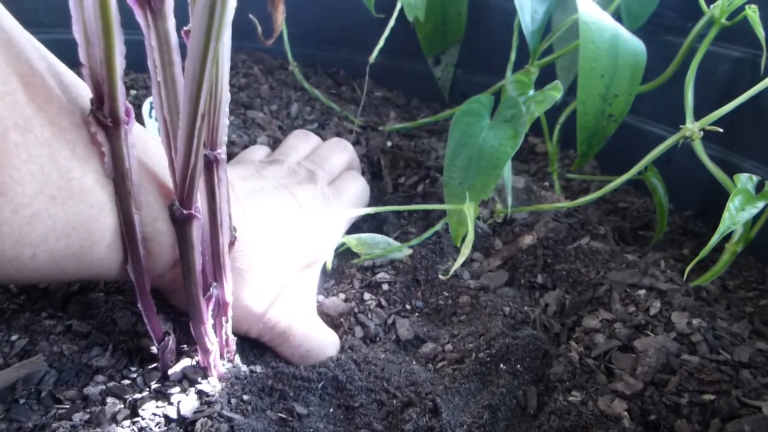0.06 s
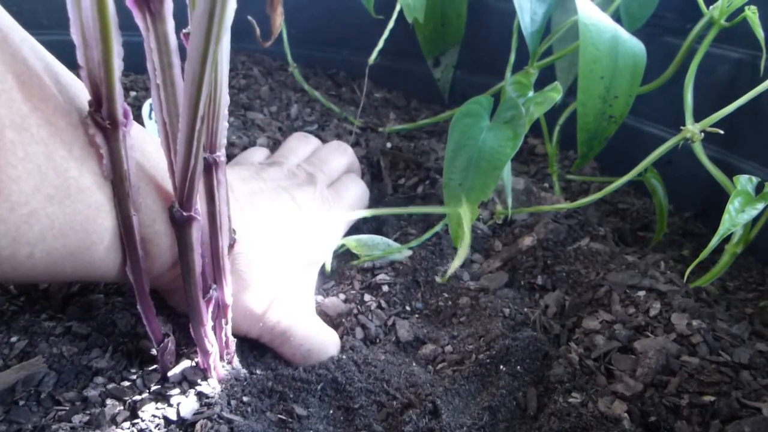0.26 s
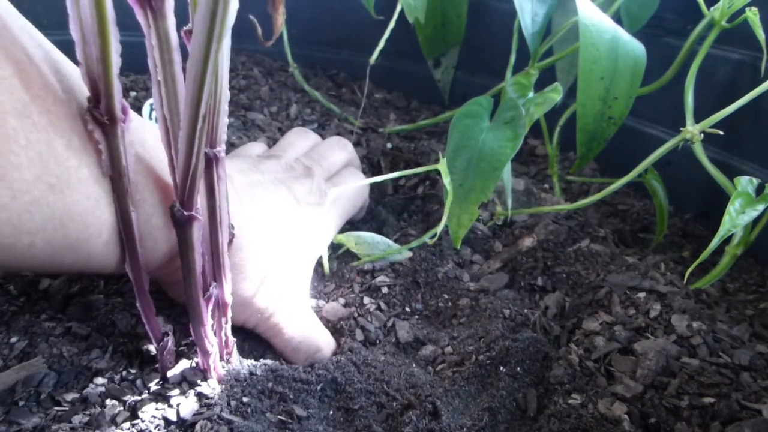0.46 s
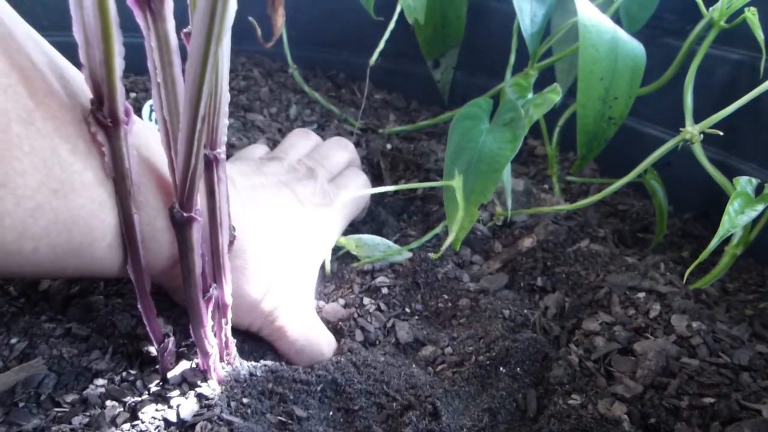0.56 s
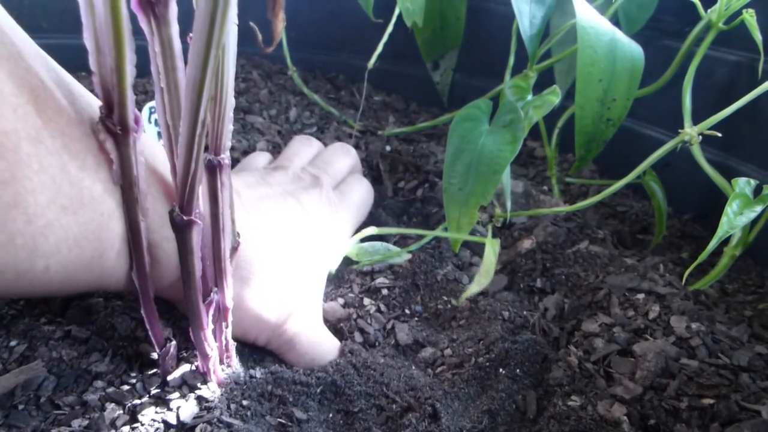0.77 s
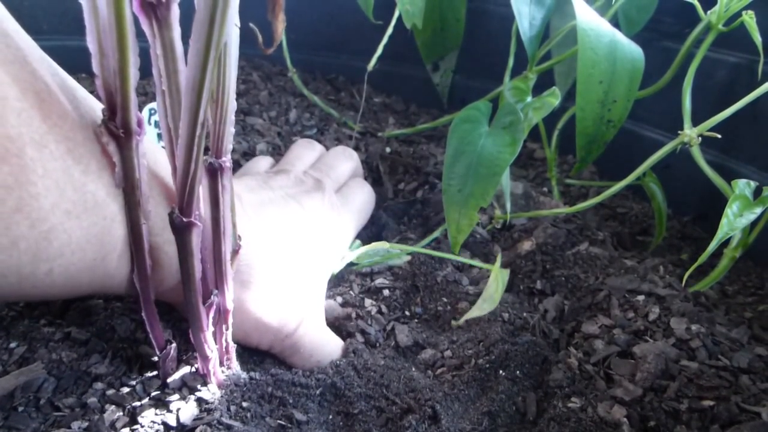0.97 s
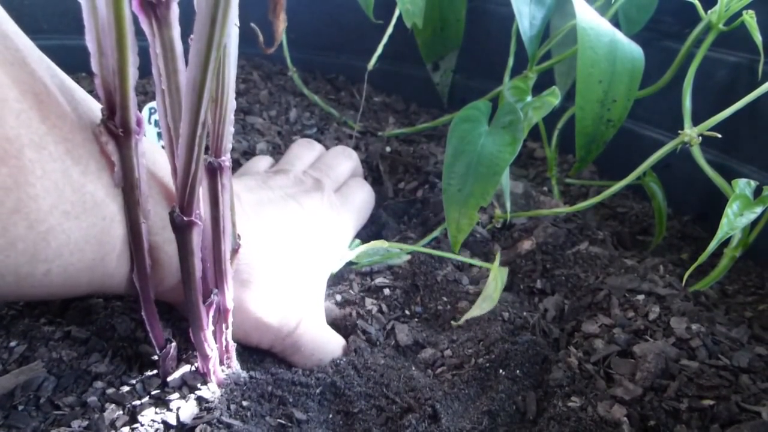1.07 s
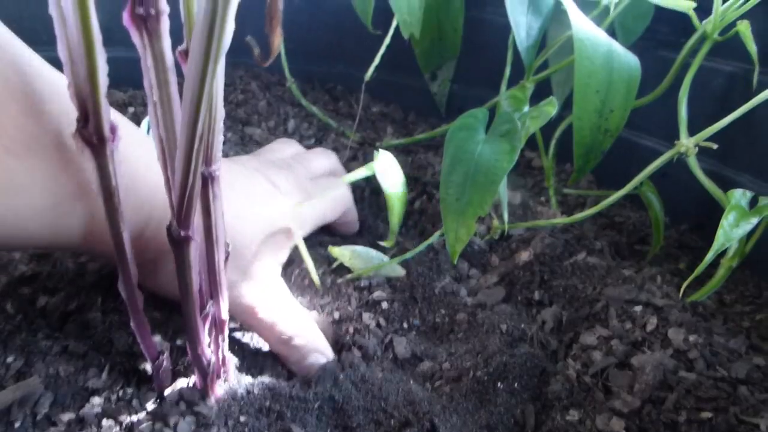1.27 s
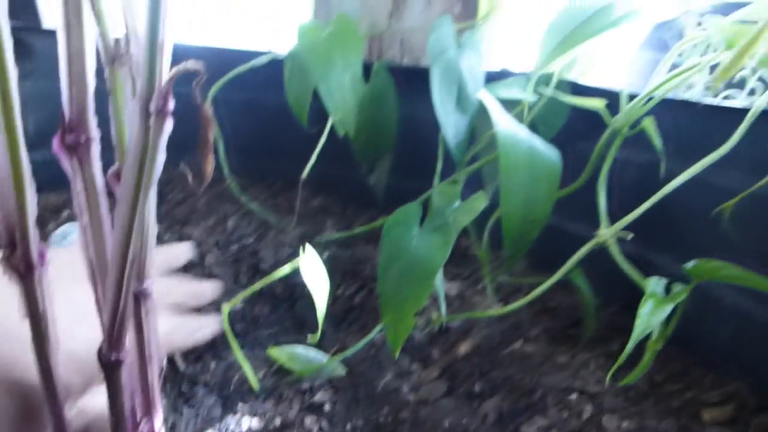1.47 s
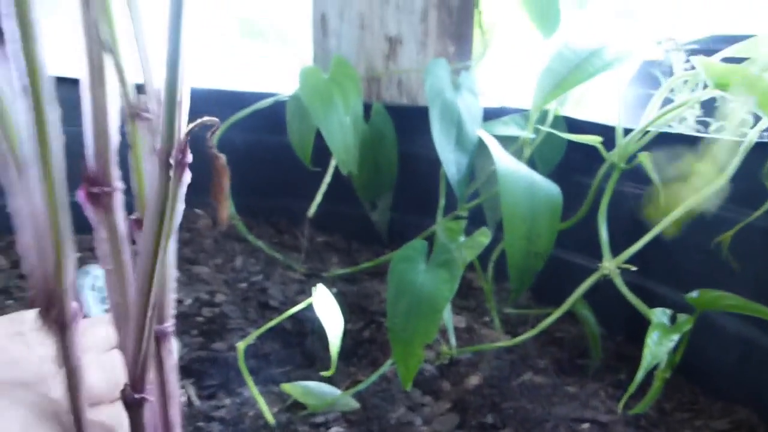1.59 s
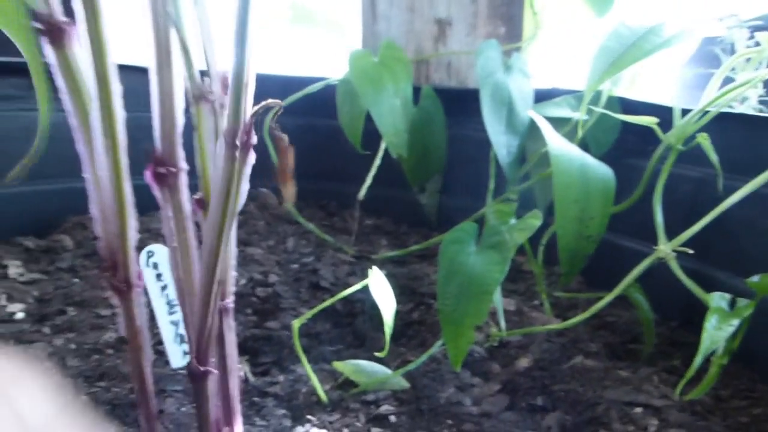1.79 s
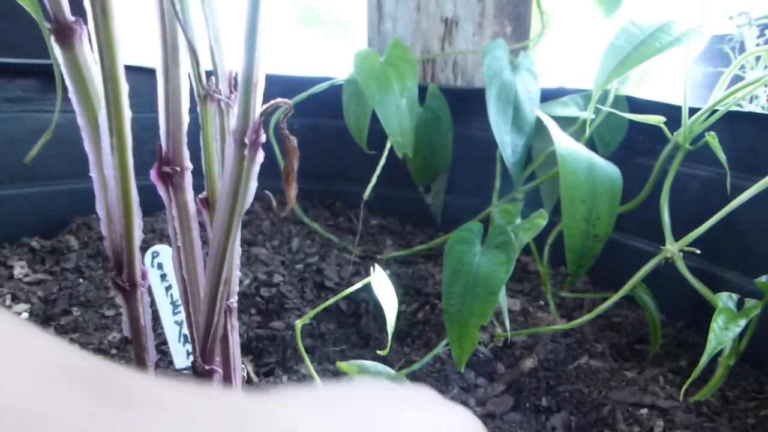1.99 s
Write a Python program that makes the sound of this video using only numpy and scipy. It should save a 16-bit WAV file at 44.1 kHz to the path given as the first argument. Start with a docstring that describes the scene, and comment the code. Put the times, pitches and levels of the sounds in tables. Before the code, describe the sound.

Soil scraping and crackling under a hand, followed by leaves brushing and light hollow bumps.

```python
"""Fingers work loose potting soil in a plastic planter, close by, over the faint air of a quiet garden.
A hollow knock and a scrape open the scene. Crumbs rustle and grit crackles in thousands of tiny slips,
while bark chips snap and a dry twig breaks. From about 1.3 s the hand draws back: the arm brushes along
stems and leaves with a hiss and a dull rub, hollow bumps ring briefly, and a fine tick comes near the end."""
import sys
import numpy as np
from scipy import signal
from scipy.fft import rfft, irfft
from scipy.io import wavfile
from scipy.ndimage import uniform_filter1d

SR = 44100
rng = np.random.default_rng(int(sys.argv[2]) if len(sys.argv) > 2 else 0)


def log_audio(samples):
    """Write samples as a 16-bit WAV file to the path given in sys.argv[1]."""
    # one column per channel
    frames = np.atleast_2d(samples).T
    # limit to full scale, then quantise
    limited = np.clip(frames, -1, 1)
    pcm = np.round(limited * 32767).astype(np.int16)
    wavfile.write(sys.argv[1], SR, pcm)


N = 90096
T = np.arange(N) / SR

# fingers pressing through the soil: time_s, level_db
DIGGING_LEVEL = [(.2, -59), (.27, -62.5), (.33, -56), (.40, -54.5), (.45, -47), (.49, -49.5), (.51, -51.5),
                 (.59, -53.5), (.635, -50), (.657, -54.5), (.70, -50.5), (.74, -47.5), (.78, -51.5),
                 (.87, -49), (.915, -52.5), (.945, -47.5), (.97, -49.5), (1.0, -52.5), (1.04, -44.5),
                 (1.07, -42.5), (1.14, -56), (1.225, -59), (1.3, -52)]
# tone of the crumbs and of the loose grit: freq_hz, gain_db
CRUMB_COLOUR = [(150, -7.5), (400, -3), (1500, -6), (2400, -5.5), (3400, -7), (4200, 0.5), (5200, -1),
                (8000, 0), (10000, -2), (12000, -7.5), (14000, -15.5), (16000, -24)]
GRIT_COLOUR = [(1000, -12), (3000, -6), (5000, 1), (8000, 1), (11500, -2), (15000, -17)]
# soft, dull pushes of hand and arm: centre_s, half_length_s, level_db, pitch_hz, width_hz
PATS = [(0.974, .012, -54.5, 1040, 120), (1.08, 0.0084, -52, 239, 100), (1.481, 0.006, -39.5, 386, 100),
        (1.551, 0.041, -47.5, 171, 60), (1.769, 0.04, -43.5, 311.5, 79.5)]
# envelope of the opening scrape: time_s, level_db
SCRAPE_LEVEL = [(0, -33), (.025, -32.5), (.05, -32), (.065, -35.5), (.085, -41.5), (.11, -40.5), (.15, -44),
                (.2, -54.5), (.24, -71), (.3, -90)]
# its tone: freq_hz, gain_db
SCRAPE_COLOUR = [(100, -34), (220, -8), (600, -2.5), (1250, 4.5), (2200, -1), (3300, -3), (5000, -.5),
                 (8000, -5.5), (11000, -9.5), (13000, -24), (16000, -32)]
# its resonances: pitch_hz, gain_db, width_hz
SCRAPE_PEAKS = [(377, 3, 21), (607, 9, 23), (730, 5.5, 46), (1303, 5, 60), (1780, 3.5, 50)]
# bark chips and grit snapping: start_s, level_db, pitch_hz, decay_s
SNAPS = [(0.2973, -41.5, 6840, 0.0035), (.299, -43, 10350, 0.0038), (0.3713, -40, 8500, 0.0011),
         (.444, -44, 5200, .002), (.573, -39, 5600, .0014), (.5815, -43, 11100, .001),
         (.6238, -41, 11600, .002), (.636, -37.5, 7800, 0.0016), (0.636, -43, 11600, .002),
         (.644, -41, 8460, .0022), (.672, -38, 7260, .001), (.6745, -41, 1100, 0.0027),
         (.677, -40, 6500, .0018), (0.713, -33.5, 11500, .0011), (.7125, -38, 5400, .0014),
         (.728, -43, 5200, .0028), (.7355, -41, 7500, .003), (0.7458, -39, 7000, .0012),
         (.749, -35.5, 5600, .0022), (.7583, -34.5, 5500, .0017), (.759, -41, 1500, 0.0039),
         (.829, -42.5, 5200, .0008), (1.01, -37.5, 6550, 0.00093), (1.041, -38, 6500, .001),
         (1.311, -41, 4240, 0.0013), (1.363, -36, 7050, .0006), (1.706, -26, 9600, 0.0011),
         (1.729, -32, 5970, .0012)]
# modes of the dry twig: pitch_hz, gain_db, decay_s
TWIG_MODES = [(3170, -9.5, 0.0026), (5730, -4.5, 0.002), (7130, -2, 0.0014), (9000, -12, .001)]
# a fine tick near the end: start_s, level_db, pitch_hz, decay_s
TICK = (1.9645, -13.5, 9900, .00045)
# arm sliding past the leaves: time_s, level_db
BRUSH_LEVEL = [(1.2, -92), (1.25, -49.5), (1.29, -46), (1.33, -36.5), (1.37, -40.5), (1.42, -40),
               (1.455, -32.5), (1.49, -36), (1.55, -30.5), (1.595, -37), (1.72, -35), (1.82, -34.5),
               (1.885, -33), (1.915, -37), (1.945, -44), (1.985, -38), (2.04, -37)]
# tone of the leaves: freq_hz, gain_db
BRUSH_COLOUR = [(100, -20.5), (300, -6), (800, -5.5), (1600, -4.5), (2600, -7), (3500, -4), (4050, 3.5),
                (4400, 0), (5200, 1.5), (6400, -2), (8200, 0.5), (10500, -3.5), (12500, -10), (16000, -27)]
# rasps of a fingertip, single leaves and stems: centre_s, half_length_s, level_db, pitch_hz, width_hz
SWISHES = [(0.944, .009, -43, 6300, 4500), (1.475, 0.039, -39, 11800, 4500),
           (1.522, .014, -40, 12800, 5000), (1.568, 0.0016, -27, 3960, 3500),
           (1.569, 0.0026, -30.5, 1780, 500), (1.644, 0.028, -40, 4520, 900),
           (1.734, 0.11, -44, 2360, 1830), (1.868, 0.039, -42.5, 3300, 1100),
           (2.008, 0.044, -44.5, 3600, 915)]
# dull rubbing as the arm moves: time_s, level_db
RUB_LEVEL = [(1.3, -72), (1.37, -50.5), (1.435, -50.5), (1.455, -40), (1.48, -44), (1.505, -41.5),
             (1.522, -36), (1.55, -33), (1.6, -37), (1.65, -39), (1.69, -39), (1.72, -45), (1.775, -39.5),
             (1.81, -47.5), (1.88, -46.5), (1.93, -63)]
# its tone: freq_hz, gain_db
RUB_COLOUR = [(60, -32), (120, -26), (170, -7), (240, -7), (350, 0.5), (500, -2.5), (780, 0), (1200, 0),
              (1750, -6), (2400, -8.5), (5000, -26), (15000, -40)]
# planter resonances under the rubbing: pitch_hz, gain_db, width_hz
RUB_PEAKS = [(372, 4, 30), (754, 4, 69), (1130, 2.5, 33), (1660, 4, 65)]
# hollow bumps: start_s, level_db, pitch_hz, decay_s, ring_gain_db, side_ratio
BUMPS = [(.002, -28.5, 706, 0.017, -7, .05), (.0065, -31, 375.7, 0.019, -16, 0.02),
         (.0088, -19.5, 1326, 0.0061, -11.5, 0), (.0223, -18, 1235, .0042, -16, 0),
         (1.4437, -13.5, 1010, 0.0025, -8.5, 0.48), (1.5159, -24, 756, .0044, -16, 0.4),
         (1.523, -23, 992, 0.002, -12, .5), (1.5358, -21.5, 795, 0.0062, -8.5, .6),
         (1.5438, -24, 1066, .0023, -7, 0.5), (1.5668, -21, 1148, 0.0082, -2.5, 0.25)]
# the hollow ring after each bump: pitch_hz, gain_db, t60_s
HOLLOW_MODES = [(380, -4, .056), (596, -16, 0.064), (803, -2, .058), (1138, -12, 0.039), (1650, -10, 0.037),
                (1850, -15, .036), (3320, -16, 0.031), (4720, -19, 0.036)]
# echoes from the planter wall and the post: delay_s, gain_ratio
ECHOES = [(.0013, 0.045), (.0047, 0.15), (.0083, 0.19)]
# tone of the outdoor air: freq_hz, gain_db
GARDEN_COLOUR = [(25, -15), (60, -11), (110, -6), (230, -3.5), (330, -4), (440, -4.5), (620, -1),
                 (1050, -1.5), (1600, -6.5), (2600, -11.5), (3700, -19), (9800, -25), (15000, -31)]
# stereo width, side against mid (crumbs and leaves share the first): freq_hz, side_db
RUSTLE_WIDTH = [(100, -17), (700, -9.5), (2400, -26), (4200, -52), (6800, -44), (8800, -21), (11000, -14),
                (15000, -26)]
SCRAPE_WIDTH = [(1200, -20), (4400, -63), (12000, -19)]
RUB_WIDTH = [(170, -12), (380, -3.5), (750, -3), (1400, -11), (3000, -15)]
GARDEN_WIDTH = [(150, -15.5), (400, -9.5), (1300, -6.5), (3000, -21), (6000, -27), (11000, -20)]


def digging():
    """Crumbs slip past each other under the fingers in a dense rustle, with sparser grit crackling in it."""
    crumbs = friction(CRUMB_COLOUR, RUSTLE_WIDTH, per_s=14000, spread_db=2.5, rough_db=1.0)
    grit = rms_one(colour(grains(per_s=260, spread_db=3), GRIT_COLOUR))
    return level(DIGGING_LEVEL) * rms_one(crumbs + from_db(-8) * grit)


def pats():
    """Hand and arm push softly: dull, narrow swells of noise."""
    return sum(swell(*row) for row in PATS)


def scrape():
    """The opening scrape: dense slips with a few resonances standing out."""
    slips = friction(SCRAPE_COLOUR, SCRAPE_WIDTH, per_s=12000, spread_db=1.5, rough_db=1.0)
    return level(SCRAPE_LEVEL) * peaked(slips, SCRAPE_PEAKS)


def bark_snaps():
    """Each chip gives a broad crack and rings briefly around its own pitch."""
    ring_q, ring_top_hz = 4.4, 12800
    crack_db, crack_decay_s = -5.5, 0.00083
    out, size = np.zeros(N), 2048
    t = T[:size]
    for start_s, db, hz, decay_s in SNAPS:
        noise = rng.standard_normal(size)
        ring = even(resonate(noise, hz, hz / ring_q)) * np.exp(-t / decay_s)
        ring = band(ring, hz * 0.43, min(hz * 1.5, ring_top_hz), order=3)
        crack = band(from_db(crack_db) * noise[::-1] * np.exp(-t / crack_decay_s), 3000, 12500)
        start = int(start_s * SR)
        out[start:start + size] += from_db(db) * (ring + crack)[:N - start]
    return out


def twig():
    """A dry twig breaks: its bright modes start together and die within milliseconds."""
    start_s, break_db = .5147, -25
    modes = sum(ping(start_s, break_db + db, hz, decay_s) for hz, db, decay_s in TWIG_MODES)
    return band(modes, 2930, 11000, order=3)


def tick():
    """One fine, high tick."""
    return band(ping(*TICK), 8400, 11400, order=3)


def leaf_brush():
    """Skin slides over leaves and stems: a hiss with crinkles in it."""
    hiss = friction(BRUSH_COLOUR, RUSTLE_WIDTH, per_s=22000, spread_db=2.5, rough_db=0.8)
    return level(BRUSH_LEVEL) * rms_one(hiss + from_db(-6.5) * crinkle())


def crinkle(decay_s=0.0016):
    """Leaves catch and let go at random, each time with a tiny burst of noise; rms 1."""
    catches = np.abs(grains(per_s=90, spread_db=1.5))
    bursts = signal.lfilter([1], [1, -np.exp(-1 / (decay_s * SR))], catches + 1e-18)
    return rms_one(colour(bursts * rng.standard_normal(N), BRUSH_COLOUR))


def swishes():
    """A fingertip, single leaves and stems slide by, each in its own band of noise."""
    return sum(swell(*row) for row in SWISHES)


def arm_rub():
    """The moving arm rubs, dull and uneven, and the planter resonates under it."""
    slips = friction(RUB_COLOUR, RUB_WIDTH, per_s=2500, spread_db=2.0, rough_db=1.9)
    return level(RUB_LEVEL) * peaked(slips, RUB_PEAKS)


def bumps():
    """Knocks against the planter and stems, some wider in stereo than others."""
    return sum(spread(bump(*row), side_ratio) for *row, side_ratio in BUMPS)


def bump(start_s, db, hz, decay_s, ring_db):
    """A short knock that sags a little in pitch and leaves the hollow modes ringing."""
    attack_s, sag_ratio = 0.0018, 0.067
    t = np.maximum(T - start_s, 0)
    sag = 1 - sag_ratio * np.tanh(t / decay_s / 10)
    knock = np.exp(-t / decay_s) * np.sin(2 * np.pi * hz * t * sag)
    ring = np.zeros(N)
    for k, (mode_hz, mode_db, t60_s) in enumerate(HOLLOW_MODES):
        polarity = (-1) ** (k + 1)
        ring += polarity * from_db(ring_db + mode_db - 60 * t / t60_s) * np.sin(2 * np.pi * mode_hz * t)
    attack = np.minimum(t / attack_s, 1)
    return band(from_db(db) * (knock + ring) * attack, 230, 7400, order=3)


def close_echoes(x):
    """Nearby surfaces add faint, delayed copies to a stereo sound."""
    return x + sum(gain * np.array([np.interp(T - delay_s, T, channel, left=0) for channel in x])
                   for delay_s, gain in ECHOES)


def garden_air(level_db=-54.5):
    """A faint, steady bed of outdoor air."""
    mid, side = (rms_one(colour(rng.standard_normal(N), GARDEN_COLOUR)) for _ in range(2))
    return from_db(level_db) * stereo(mid, colour(side, GARDEN_WIDTH))


def friction(tone, width, per_s, spread_db, rough_db):
    """Dense slips, roughened by uneven pressure and coloured by the material."""
    mid, side = (rms_one(colour(grains(per_s, spread_db), tone)) for _ in range(2))
    pressure = rms_one(from_db(rough_db * drift(rate_hz=123)))
    return stereo(mid, colour(side, width)) * pressure


def grains(per_s, spread_db):
    """Tiny random slips: many small, a few large."""
    sizes = from_db(spread_db * np.minimum(rng.exponential(1, N), 5))
    polarity = rng.choice([-1, 1], N)
    return sizes * polarity * (rng.random(N) < per_s / SR)


def swell(centre_s, half_length_s, db, hz, width_hz):
    """A band of rubbing noise that rises and falls."""
    noise = resonate(resonate(rng.standard_normal(N), hz, width_hz), hz, width_hz)
    return from_db(db) * rms_one(noise) * np.exp(-.5 * ((T - centre_s) / half_length_s) ** 2)


def ping(start_s, db, hz, decay_s):
    """One mode with a sudden start and an exponential tail."""
    t = np.maximum(T - start_s, 0)
    return from_db(db) * np.exp(-t / decay_s) * np.sin(2 * np.pi * hz * t)


def drift(rate_hz):
    """Smooth random wander; rms 1."""
    size = max(int(SR / rate_hz), 2)
    smoothed = uniform_filter1d(rng.standard_normal(N), size, mode="wrap")
    return rms_one(uniform_filter1d(smoothed, size, mode="wrap"))


def even(x):
    """Keep the pitch wander of narrow noise and flatten its envelope."""
    return np.sqrt(2) * np.cos(np.angle(signal.hilbert(x)))


def peaked(x, peaks):
    """Raise narrow resonances out of a noise; rms 1."""
    return rms_one(x + sum((from_db(db) - 1) * resonate(x, hz, width_hz) for hz, db, width_hz in peaks))


def resonate(x, hz, width_hz):
    """One resonance with unity gain at its peak."""
    return signal.lfilter(*signal.iirpeak(hz, hz / width_hz, fs=SR), x + 1e-18)


def band(x, low_hz, high_hz, order=2):
    """Band-pass between two edges."""
    sections = signal.butter(order, [low_hz, high_hz], "band", fs=SR, output="sos")
    return signal.sosfilt(sections, x + 1e-18)


def colour(x, curve):
    """EQ by a curve of (freq_hz, gain_db) points."""
    hz, db = np.transpose(curve)
    bin_hz = np.maximum(np.arange(N // 2 + 1) * SR / N, 1)
    gain = from_db(np.interp(np.log(bin_hz), np.log(hz), db))
    return irfft(rfft(x) * gain, N)


def level(curve):
    """Gain envelope from (time_s, level_db) points, holding its first and last values."""
    time_s, db = np.transpose(curve)
    return from_db(np.interp(T, time_s, db))


def spread(x, side_ratio):
    """Widen a mono sound with a side signal a quarter cycle out of phase."""
    return stereo(x, side_ratio * signal.hilbert(x).imag)


def stereo(mid, side):
    """Left and right from mid and side."""
    return np.array([mid + side, mid - side])


def from_db(db):
    """Decibels to gain."""
    return 10 ** (np.asarray(db) / 20)


def rms_one(x):
    """Scale to rms 1."""
    return x / np.sqrt(np.mean(x ** 2) + 1e-20)


def scene():
    """Soil and arm with their close echoes, then snaps and bumps, all over the garden air."""
    soil = scrape() + digging() + pats()
    arm = leaf_brush() + arm_rub() + swishes()
    snaps = spread(bark_snaps() + twig() + tick(), side_ratio=0.045)
    return close_echoes(soil + arm) + snaps + bumps() + garden_air()


def record(dry):
    """A steep low-pass takes off the very top."""
    cutoff_hz = 15750
    return signal.sosfilt(signal.ellip(12, .1, 80, cutoff_hz, fs=SR, output="sos"), dry)


dry = scene()
out = record(dry)
log_audio(out)
```